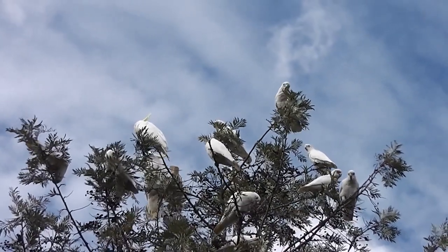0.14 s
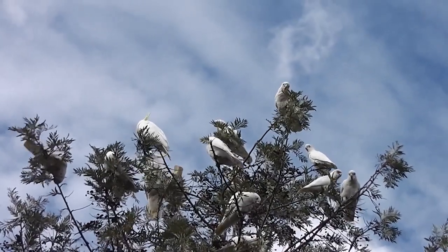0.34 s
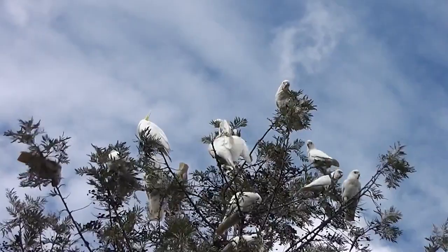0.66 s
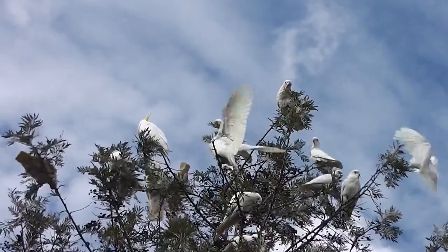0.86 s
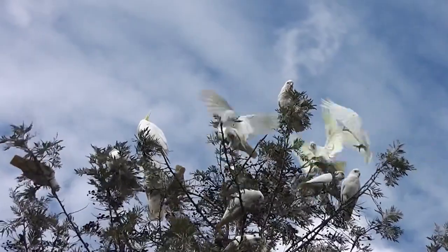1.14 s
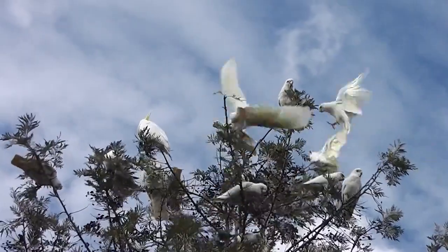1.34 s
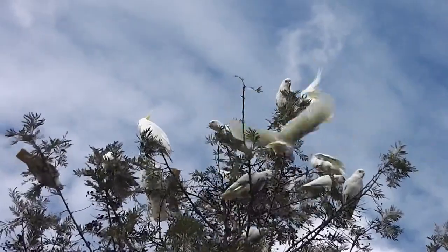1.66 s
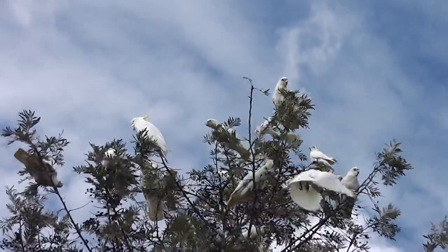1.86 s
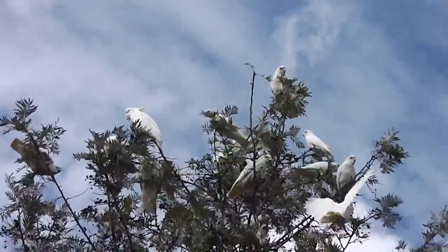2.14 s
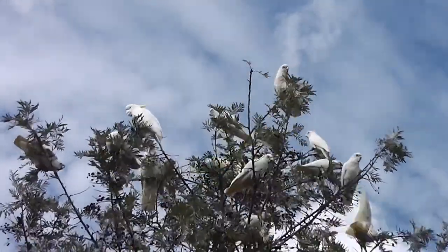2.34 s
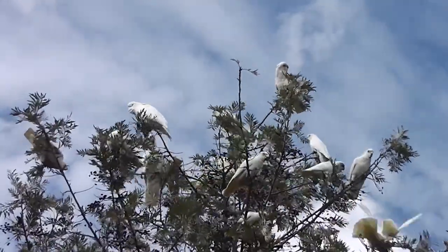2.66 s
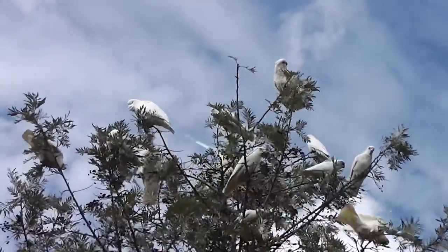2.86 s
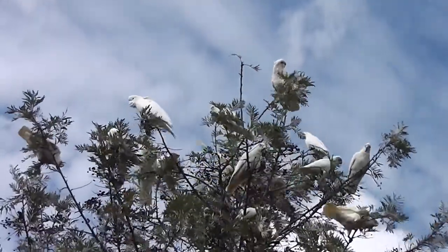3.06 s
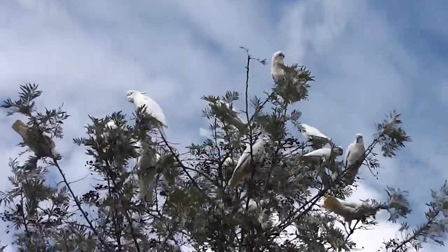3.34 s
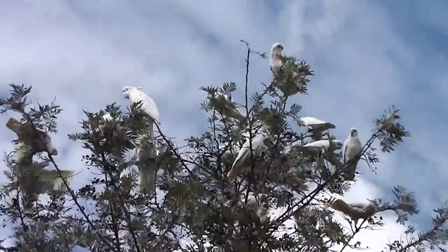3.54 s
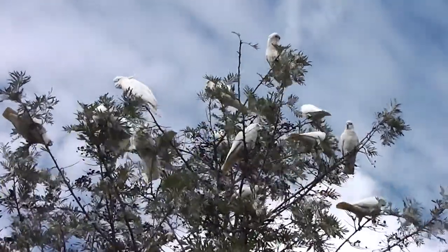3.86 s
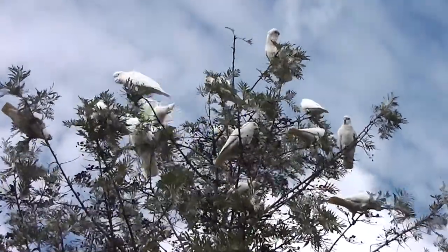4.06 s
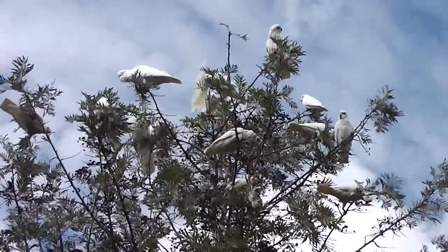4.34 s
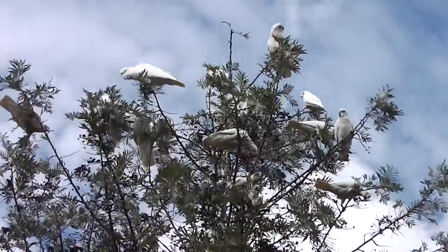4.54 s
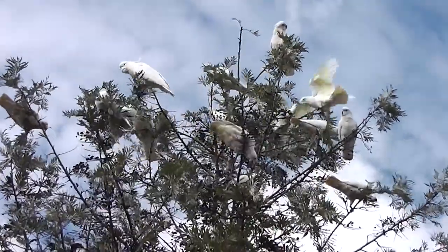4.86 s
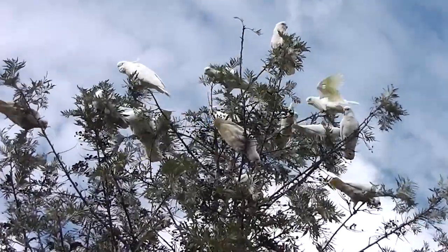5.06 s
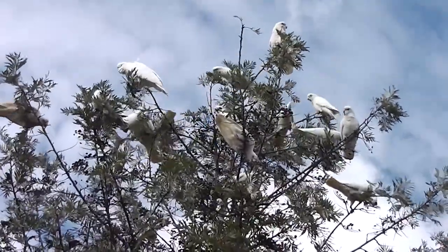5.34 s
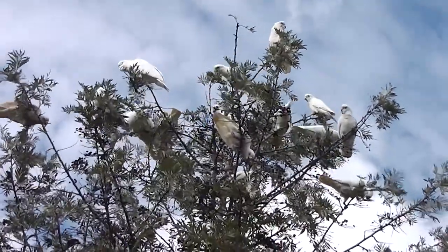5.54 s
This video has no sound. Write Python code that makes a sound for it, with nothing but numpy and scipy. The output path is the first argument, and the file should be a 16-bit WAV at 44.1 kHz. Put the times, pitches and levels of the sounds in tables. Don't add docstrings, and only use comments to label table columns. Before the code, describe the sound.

Large white parrots call from a leafy crown: first one farther harsh screech, then a cluster of close, bright, grating cries. Dry twig cracks, claw ticks and soft wood knocks scatter between them. After a quieter gap, a small two-note whistle and thin chips sound at right, then a short hoarse squawk ends it. Low road rumble and faint hiss lie beneath, in an open-air stereo pickup with short scattered echoes.

```python
import sys
import numpy as np
from scipy import signal
from scipy.fft import rfft, irfft
from scipy.io import wavfile
from scipy.ndimage import uniform_filter1d

SR = 44100
rng = np.random.default_rng(int(sys.argv[2]) if len(sys.argv) > 2 else 0)


def linear_from_db(decibels):
    return 10 ** (np.asarray(decibels, float) / 20)


def dump_mix(stems):
    frames = np.atleast_2d(stems).T
    limited = np.clip(frames, -1, 1)
    pcm = np.round(limited * 32767).astype(np.int16)
    wavfile.write(sys.argv[1], SR, pcm)


N = 251370


def rms_one(x):
    return x / np.sqrt(np.mean(x ** 2) + 1e-20)


def in_time(rows, t):
    s, *columns = np.transpose(rows)
    return [np.interp(t, s, column) for column in columns]


def at_hz(points, hz):
    curve_hz, value = np.transpose(points)
    return np.interp(np.log(hz), np.log(curve_hz), value)


def span(start_s, end_s):
    where = slice(int(start_s * SR), min(int(end_s * SR), N))
    return where, np.arange(where.start, where.stop) / SR


def drift(rate_hz, size):
    r = np.exp(-2 * np.pi * rate_hz / SR)
    warm_up = 9000
    slow = signal.lfilter([1], [1, -2 * r, r * r], rng.standard_normal(size + warm_up))[warm_up:]
    return rms_one(slow - slow.mean())


def coloured(x, spectrum):
    hz = np.maximum(np.fft.rfftfreq(x.shape[-1], 1 / SR), 1)
    return irfft(rfft(x) * linear_from_db(at_hz(spectrum, hz)), x.shape[-1])


def panned(x, pan_db):
    return x * linear_from_db(np.array([[.5], [-.5]]) * pan_db)


def band_pass(x, order, low_hz, high_hz):
    sos = signal.butter(order, [low_hz, high_hz], "band", fs=SR, output="sos")
    return signal.sosfilt(sos, x)


def burst(ring_hz, width_hz, t60_s):
    t = np.arange(2500) / SR
    r = np.exp(-np.pi * width_hz / SR)
    y = rng.standard_normal(len(t)) * linear_from_db(-60 * t / t60_s)
    for _ in range(2):
        y = signal.lfilter([1, 0, -1], [1, -2 * r * np.cos(2 * np.pi * ring_hz / SR), r * r], y)
    return y / np.abs(y).max()


def banded_noise(spectrum, patchy_db, in_step=0.11):
    # pitch_hz, likeness (0-1)
    likeness = [(25, .985), (60, .96), (125, .83), (300, .6), (1000, .55), (3000, .43), (8000, .4),
                (14000, .42)]
    out, together = 0, drift(14, N)
    edges_hz = 20 * 2 ** np.arange(0, 10.5, .5)
    white = rng.standard_normal((2, 2, N))
    for k, (low_hz, high_hz) in enumerate(zip(edges_hz, edges_hz[1:])):
        if high_hz < spectrum[0][0] or low_hz > spectrum[-1][0]:
            continue
        mid, side = band_pass(white[k % 2], 2, low_hz, high_hz)
        alike = np.clip(at_hz(likeness, np.sqrt(low_hz * high_hz)), -1, 1)
        flicker = linear_from_db(patchy_db * (in_step * together + drift(12.4, N)))
        out = out + flicker * (np.sqrt(1 + alike) * mid + np.sqrt(1 - alike) * side * [[1], [-1]])
    return rms_one(coloured(out, spectrum))


def motor_drone(t):
    # pitch_hz, level_db
    hum = [(105, -5), (141, -1.5)]
    # time_s, level_db
    loudness = [(0.0, -57.5), (0.3, -69), (0.45, -61), (1.06, -54), (2.0, -53), (2.3, -52.5), (2.7, -58.5),
                (3.29, -54.5), (3.57, -64), (5.7, -65)]
    motor = 0
    for hz, level_db in hum:
        swell = linear_from_db(level_db + drift(1.6, N))
        phase = 2 * np.pi * np.cumsum(hz * (1 + 0.0081 * drift(1.49, N))) / SR
        motor = motor + swell * np.sin(phase)
    (motor_db,) = in_time(loudness, t)
    return linear_from_db(motor_db) * motor


def background():
    # pitch_hz, level_db
    rumble_colour = [(12, -53), (20, -16), (54, 5.5), (145, -11), (168, -17), (296, -14.5), (400, -5),
                     (520, -12), (880, -120)]
    # pitch_hz, level_db
    traffic_colour = [(200, -3.5), (250, -0.5), (310, -21.5), (450, -2.5), (700, -4), (1200, -5),
                      (1900, -8), (2200, -14), (2700, -26), (4000, -53)]
    # pitch_hz, level_db
    leaf_colour = [(2000, -12), (2800, -7), (4000, -2.5), (6000, -2.5), (9000, -4), (11000, -10),
                   (14000, -24), (16000, -27)]
    # pitch_hz, level_db
    hiss_colour = [(2000, -22), (6000, -28), (15500, -0.5), (17000, -3)]
    # time_s, level_db
    road = [(0.0, -54.5), (0.6, -55.5), (1.1, -53), (2.1, -54), (3.4, -53), (4.7, -54.5), (5.0, -56.5),
            (5.7, -56.5)]
    # time_s, level_db
    leaf_level = [(0.0, -61.5), (0.43, -59), (0.7, -56.5), (0.88, -60), (1.06, -58), (2.06, -58.5), (2.24, -57.5),
                  (2.38, -42), (2.6, -53), (3.29, -51.5), (3.76, -58), (4.05, -59), (4.35, -57), (4.79, -58.5),
                  (4.95, -59.5), (5.21, -62.5), (5.48, -60.5), (5.7, -62)]
    t = np.arange(N) / SR
    (traffic_db,), (leaves_db,) = in_time(road, t), in_time(leaf_level, t)
    rumble_db = -55.5 + 0.38 * (traffic_db - traffic_db.mean()) - 0.48 * t
    rumble = linear_from_db(rumble_db) * banded_noise(rumble_colour, patchy_db=1.0)
    traffic = linear_from_db(traffic_db) * banded_noise(traffic_colour, patchy_db=1.2)
    leaves = linear_from_db(leaves_db) * banded_noise(leaf_colour, patchy_db=1.5, in_step=.8)
    hiss = linear_from_db(-66) * banded_noise(hiss_colour, patchy_db=-0.5)
    return rumble + traffic + leaves + motor_drone(t) + hiss


def echoes(x, crown_db):
    # pitch_hz, level_db
    echo_colour = [(500, -3), (1500, -3), (2400, 5), (6000, 6), (9000, 6), (11000, 5.5)]
    long_t60_s, crown_t60_s, gap_s, echo_db = 0.84, 0.24, 0.0007, -6.5
    t = np.arange(int(.8 * SR)) / SR
    hits = rng.standard_normal((2, len(t))) * (rng.random((2, len(t))) < .05)
    shared = hits + 0.16 * hits[::-1]
    fading = linear_from_db(-60 * t / long_t60_s) + linear_from_db(crown_db - 60 * t / crown_t60_s)
    tail = coloured(shared * fading * np.clip(t / gap_s - 1, 0, 1), echo_colour)
    tail /= np.sqrt(np.sum(tail ** 2) / 2)
    return linear_from_db(echo_db) * signal.fftconvolve(x, tail, axes=1)[:, :N]


def twigs():
    # time_s, peak_db, ring_hz, thud_db, pan_db (left minus
    snaps = [(0.1532, -36.5, 7100, -8, 3), (1.2247, -34, 8100, -7, 2), (1.3962, -38, 8550, -10, 2),
             (2.144, -37, 7600, -18, -5), (2.1694, -30, 8900, -29, 5), (2.1925, -31.5, 8000, -13, -4),
             (2.2104, -35.5, 7800, -21, -4), (2.2556, -20.5, 8600, -18, 0), (2.948, -30, 7300, -20, -2),
             (3.2985, -27, 6660, -27, 1), (3.6001, -35, 5930, -2.5, 0), (4.1548, -45, 6400, 1, -6),
             (4.4463, -29.5, 4960, -7.5, 2), (4.6597, -31, 6960, -9.5, -0.5), (4.886, -34, 7950, -30, 0.0),
             (5.2802, -35, 6340, -34, -1.0)]
    # time_s, peak_db, ring_hz, pan_db
    ticks = [(0.292, -45, 6750, 0.5), (0.386, -46, 8560, 1), (0.398, -46.5, 7400, -10),
             (1.863, -49, 7900, 2), (2.0753, -41, 9200, 3), (2.1053, -41.5, 5150, -1),
             (4.089, -49, 8300, -4.5), (4.285, -45, 6200, 4), (4.4894, -42, 7550, 0),
             (4.606, -50, 5800, -11), (4.765, -53, 7540, -14), (4.809, -40, 9000, 0.0),
             (5.1933, -45, 7790, 0.0), (5.6672, -45, 6580, -4), (5.683, -43, 6200, -1),
             (4.044, -59, 7000, 1), (4.505, -56, 7800, 0.1), (3.196, -32.5, 10300, -2),
             (3.243, -48, 12500, 0.1), (2.908, -48, 10430, 4), (3.0, -45, 12000, 0.1),
             (0.552, -51, 8350, 0.1), (0.602, -41, 10500, 0.1), (1.11, -51, 7500, 3)]
    # time_s, peak_db, ring_hz, pan_db
    brushes = [(1.245, -42.5, 7040, 0.1), (1.385, -45, 8160, 0.1), (1.6457, -43, 8050, 1),
               (1.66, -52, 6200, 0.1), (2.575, -53, 9300, 5), (0.19, -45.5, 7800, 0.1)]
    # time_s, peak_db, ring_hz
    knocks = [(1.235, -44, 625), (1.75, -46, 780), (3.595, -41.5, 635), (3.598, -44, 234),
              (3.809, -42.5, 584), (3.82, -43, 434), (3.95, -48.5, 625), (4.068, -42, 214),
              (4.148, -42.5, 644), (4.443, -34, 1430), (4.445, -42, 596), (4.443, -43, 194),
              (4.707, -42, 557), (4.845, -46, 607), (5.08, -66, 716), (2.3, -43, 240), (2.33, -47, 310),
              (1.3, -48, 330)]
    thud_db = -9
    breaks = [(*row, -11) for row in snaps]
    breaks += [(s, db, hz, thud_db, pan_db, -4.5) for s, db, hz, pan_db in ticks]
    breaks += [(s, db, hz, thud_db, pan_db, 0) for s, db, hz, pan_db in brushes]
    out = np.zeros((2, N + 3000))
    for s, peak_db, ring_hz, thud_db, pan_db, tail_db in breaks:
        tick = burst(ring_hz, 0.5 * ring_hz, 0.0064)
        splinters = linear_from_db(tail_db) * np.array([burst(ring_hz, 5400, 0.11) for ear in "LR"])
        thud = linear_from_db(thud_db) * burst(640, 1300, 0.093)
        at = int(s * SR)
        out[:, at:at + len(thud)] += panned(linear_from_db(peak_db) * (tick + splinters + thud), pan_db)
    for s, peak_db, ring_hz in knocks:
        at, knock = int(s * SR), burst(ring_hz, 190, .032)
        out[:, at:at + len(knock)] += linear_from_db(peak_db) * knock
    return out[:, :N]


def far_call():
    # time_s, pitch_hz, level_db
    call = [
        (0.049, 1770, -69),
        (0.095, 1808, -57.5),
        (0.13, 1697, -49),
        (0.166, 1635, -53),
        (0.19, 1500, -57),
        (0.228, 1530, -76),
    ]
    out = np.zeros(N)
    where, t = span(call[0][0], call[-1][0])
    pitch_hz, level_db = in_time(call, t)
    wobble = 1 + 0.0034 * drift(60, len(t))
    phase = 2 * np.pi * np.cumsum(uniform_filter1d(pitch_hz, size=500) * wobble) / SR
    octave_db = -27 + 0.46 * (level_db.max() - level_db)
    tone = np.sin(phase) + linear_from_db(octave_db) * np.sin(2 * phase)
    loudness = np.sqrt(2) * linear_from_db(level_db + 1.9 * drift(48, len(t)))
    out[where] = loudness * tone * signal.windows.tukey(len(t), .1)
    return panned(out, 8.5)


def small_notes():
    # start_s, end_s, start_hz, end_hz, level_db
    far_notes = [
        (3.755, 3.848, 1500, 1004, -60),
    ]
    # start_s, end_s, start_hz, end_hz, level_db
    gulps = [
        (0.827, 0.86, 631, 530, -38.5),
        (0.844, 0.861, 1610, 1650, -34),
        (0.84, 0.861, 1146, 1090, -33),
        (5.47, 5.52, 677, 665, -41),
        (5.545, 5.6, 900, 883, -53),
        (5.55, 5.585, 1220, 1210, -53),
    ]
    # start_s, end_s, start_hz, end_hz, level_db
    chips = [
        (4.108, 4.125, 3000, 3220, -44.5),
        (4.205, 4.256, 895, 860, -38),
        (4.215, 4.249, 2870, 3080, -42.5),
        (4.21, 4.25, 3700, 3400, -53),
        (4.215, 4.25, 4820, 4850, -63),
        (4.21, 4.245, 5600, 5600, -53),
        (4.21, 4.245, 7000, 7600, -57),
    ]
    out = np.zeros((2, N))
    for rows, pan_db in [(far_notes, 8.5), (gulps, 0), (chips, -8)]:
        for start_s, end_s, start_hz, end_hz, level_db in rows:
            where, t = span(start_s, end_s)
            tone = np.sin(2 * np.pi * np.cumsum(np.linspace(start_hz, end_hz, len(t))) / SR)
            loudness = linear_from_db(level_db + 1.0 + 2 * drift(44, len(t)))
            out[:, where] += panned(tone * signal.windows.tukey(len(t), .6) * loudness, pan_db)
    return out


def hoarse_notes():
    # start_s, end_s, pitch_hz, width_hz, level_db
    breaths = [(5.5, 5.635, 3800, 530, -60.5), (5.52, 5.585, 2670, 670, -51),
               (5.425, 5.45, 3500, 310, -45.5), (4.335, 4.43, 3520, 180, -59),
               (4.33, 4.47, 4350, 1300, -59), (0.76, 0.83, 3150, 510, -42), (2.67, 2.73, 14000, 1400, -60),
               (0.78, 0.86, 660, 120, -55), (3.39, 3.46, 1433, 270, -32), (3.385, 3.46, 2180, 400, -35.5),
               (1.22, 1.33, 2500, 1500, -62.5), (5.44, 5.51, 1850, 1200, -48), (3.17, 3.3, 820, 430, -51),
               (2.3, 2.4, 4030, 780, -32), (2.68, 2.78, 3900, 540, -33), (0.52, 0.71, 1230, 820, -43),
               (0.73, 0.84, 4900, 1300, -48)]
    out = np.zeros(N)
    for start_s, end_s, hz, width_hz, level_db in breaths:
        where, t = span(start_s, end_s)
        air = rng.standard_normal(len(t)) * linear_from_db(4 * drift(200, len(t)))
        rung = rms_one(band_pass(air, 2, hz - width_hz / 2, hz + width_hz / 2))
        out[where] += rung * signal.windows.tukey(len(t), .6) * linear_from_db(level_db)
    return out


def whistle():
    # time_s, pitch_hz, level_db
    whistled = [
        [(4.035, 2090, -65), (4.043, 2100, -44), (4.078, 2097, -38), (4.1, 2090, -38), (4.109, 2130, -68)],
        [(4.122, 2057, -49), (4.13, 2110, -41), (4.156, 2190, -37), (4.185, 2080, -37.5), (4.212, 2006, -35),
         (4.234, 2140, -43), (4.255, 2220, -52)],
    ]
    # second_db, third_db, fourth_db (beside the first)
    overtones = [
        (-9, -20, -31),
        (-7.5, -14.5, -33),
    ]
    # second, third, fourth (dB per s)
    overtone_fade = [
        (-30, -30, 30),
        (-56, -85, -100),
    ]
    out = np.zeros(N)
    for rows, overtones_db, fades in zip(whistled, overtones, overtone_fade):
        where, t = span(rows[0][0], rows[-1][0])
        pitch_hz, level_db = in_time(rows, t)
        partials_db = [level_db]
        for db, fade in zip(overtones_db, fades):
            partials_db.append(level_db + db + fade * (t - t.mean()))
        wobble = 1 + 0.0011 * drift(80, len(t))
        phase = 2 * np.pi * np.cumsum(uniform_filter1d(pitch_hz, size=700) * wobble) / SR
        for k, db in enumerate(partials_db, start=1):
            out[where] += np.sqrt(2) * linear_from_db(db) * np.sin(k * phase)
        out[where] *= signal.windows.tukey(len(t), .08) * linear_from_db(drift(74, len(t)))
    return panned(out, -10)


def screech(rows, voice, throat, beak, closing, ring):
    # pitch_hz, width_hz
    hollows = [
        (4500, 310),
        (8400, 740),
    ]
    flutter_hz, swell, pull, jitter, breath = voice
    where, t = span(rows[0][0], rows[-1][0])
    size = len(t)
    cycle_hz, level_db, gape_db, chest_db = in_time(rows, t)

    rasp = np.clip(1 - .08 * chest_db, .3, 1.4)
    rasp = rasp * np.interp(t - t[0], [0, 0.031], [0.34, 1])

    along = np.linspace(-.5, .5, size)
    weak_db = level_db.max() - level_db
    first_db = beak[0] + closing[0] * along + 0.16 * weak_db - 0.87 * gape_db + chest_db
    middle_db = beak[1] + closing[1] * along + gape_db
    bright_db = beak[2] + closing[2] * along + gape_db

    flutter = 2 * np.pi * np.cumsum(flutter_hz * (1 + .1 * drift(30, size))) / SR
    phase = 2 * np.pi * np.cumsum(cycle_hz * (1 + rasp * jitter * drift(150, size))) / SR
    phase = phase + rasp * pull * np.sin(flutter)
    pulses = 0
    for k, db in enumerate([first_db, 0, middle_db, middle_db] + [bright_db] * 8, start=1):
        lean = rng.uniform(0, 2 * np.pi) + (1.15 if k == 1 else 1.44) * drift(35.0, size)
        swelling = 1 + swell * np.cos(flutter + lean) + 0.19 * drift(100, size)
        extra_rasp = .4 * rasp / k ** 2 * np.sin(flutter)
        partial = np.cos(k * phase + lean + extra_rasp)
        pulses = pulses + linear_from_db(db + 1.5 * drift(45, size)) * swelling * partial
    pulses = rms_one(pulses)

    half = np.clip(beak[3] * (1 + 0.51 * along), 0, 1)
    strong_weak = 1 + half * 2 * rasp * np.cos(phase / 2 + 0.88 * drift(104, size))
    gusts = (1 + np.cos(phase)) * (1 + swell * np.cos(flutter)) * rng.standard_normal(size)
    voiced = coloured(pulses * strong_weak + breath * gusts, throat)
    voiced = band_pass(voiced, 5, 600, 11000)
    voiced = voiced / np.sqrt(uniform_filter1d(voiced ** 2, size=900) + 1e-12)
    for (hz, width_hz), ring_db in zip(hollows, in_time(ring, t) if ring else []):
        hollow = band_pass(pulses + gusts, 2, hz - width_hz / 2, hz + width_hz / 2)
        voiced = voiced + linear_from_db(ring_db) * rms_one(hollow)
    out = np.zeros(N)
    out[where] = voiced * linear_from_db(level_db) * signal.windows.tukey(size, .012 * SR / size)
    return out


def parrots():
    # time_s, cycle_hz, level_db, gape_db (beak opening), chest_db (chest tone)
    far_screech = [(0.489, 1049, -48, 3, 2), (0.496, 1040, -44, -2, -5), (0.56, 1015, -38, 3, -3),
                   (0.619, 1004, -36, 5, 3.5), (0.691, 1067, -37.5, -2, -2.5), (0.75, 1081, -33, 1, -1.5),
                   (0.809, 1050, -35.5, -4.5, -3.5), (0.838, 1028, -32.5, 2.5, -8),
                   (0.85, 1065, -36.5, 6, 2)]
    # time_s, cycle_hz, level_db, gape_db, chest_db
    near_screeches = [
        [(2.262, 1032, -42, -15, -2), (2.284, 1091, -34.5, -3.5, -11), (2.298, 1307, -27, 3, 1.5),
         (2.315, 1270, -25, 1.5, 4.5), (2.335, 1352, -23, 3, -3), (2.37, 1358, -27, 1, -3),
         (2.41, 1296, -28, 0.5, -4.5), (2.455, 1233, -23, 1.5, 0.5), (2.518, 1134, -31.5, 3.5, 2.5)],
        [(2.626, 1226, -38, -12, 2), (2.655, 1241, -25, -5, 2), (2.696, 1197, -20, -1.5, -5),
         (2.72, 1144, -20, -3.5, -5), (2.742, 1183, -22.5, 3.5, 3), (2.775, 1237, -21.5, -6, -5),
         (2.805, 1230, -35.5, -30, 1)],
        [(2.97, 1165, -50, -10, 2), (2.986, 1211, -29.5, -6, -11), (3.03, 1249, -21.5, 2, 0.5),
         (3.08, 1242, -23.5, 2, -4), (3.106, 1249, -21.5, 0.5, 4), (3.145, 1278, -22.5, -0.5, -3),
         (3.2, 1184, -24, -1, -1.5), (3.226, 1159, -34.5, -14, 6)],
        [(3.382, 1157, -47, -1, -6), (3.4, 1190, -27, 1.5, 1.5), (3.424, 1191, -23, 6, 2.5),
         (3.45, 1206, -25, 0.5, -4), (3.47, 1210, -38, 3, 0.1)],
        [(5.42, 1127, -68, 7, 6), (5.43, 1120, -42, -8, -17), (5.46, 1210, -27.5, 0.5, -1.5),
         (5.484, 1216, -25.5, -1.4, -3.5), (5.525, 1173, -41, -10, -17)],
    ]
    # flutter_hz, flutter_swell (0-1), flutter_pull (rad), jitter (0-1), breath (share)
    voices = [
        (230, .62, .24, .013, .1),
        (200, .55, .23, .016, .13),
        (215, .6, .32, .017, .13),
        (215, .65, .27, .013, .13),
        (205, .6, .42, .023, .18),
        (230, .55, .24, .016, .1),
    ]
    # pitch_hz, level_db
    throats = [
        [(400, 16.5), (1900, 7.5), (2580, -5.5), (3200, -11), (3800, -12), (6000, -18), (9860, -35),
         (13000, -48)],
        [(400, -41), (628, -2), (900, 3.5), (2500, 1.5), (3210, 2.5), (4500, -2), (7810, -15.5), (13000, -49)],
        [(400, -21.5), (918, 1), (1800, -12), (2300, -1), (3560, -3), (4760, -8), (6800, -8), (13000, -38.5)],
        [(400, -15), (1230, 1.5), (1960, 1.5), (2700, -7), (3710, -15.5), (4360, -19), (6750, -17),
         (13000, -48)],
        [(400, -48), (666, -6.5), (1260, -3), (2900, -13.5), (3610, -9.5), (4110, -16), (5200, -12),
         (13000, -43.5)],
        [(400, -43), (700, -1), (1160, 3), (1900, -7), (3000, -11.5), (3660, -8), (6500, -9.5), (13000, -38.5)],
    ]
    # first_partial_db, middle_partials_db, brightness_db, half_rate (share)
    beaks = [
        (-7.5, 5, 5, 0.22),
        (3.5, -2.5, 0, 0.28),
        (-5.5, 2.5, 2, 0.36),
        (-3, 10, 3.5, 0.19),
        (-3.5, -3.5, -4, 0.43),
        (1.5, 5.5, 6.5, 0.35),
    ]
    # first_partial_db, middle_partials_db, brightness_db
    closings = [
        (-3.5, 11, 4),
        (9, -0.5, 2.5),
        (31, 11.5, 3),
        (-7, -3, -4),
        (26, 4, 15),
        (3, 9, 10),
    ]
    # time_s, throat_hollow_db, beak_hollow_db (beside the voice)
    beak_ring = [(0.484, -30, -50), (0.54, -8.5, -44), (0.59, -8.5, -43), (0.615, -14, -24),
                 (0.66, -23, -12), (0.69, -24, -38), (0.72, -30, -23), (0.825, -16, -6), (0.85, -26, -30)]
    calls = [far_screech] + near_screeches
    rings = [beak_ring] + [None] * len(near_screeches)
    flock = hoarse_notes()
    for call in zip(calls, voices, throats, beaks, closings, rings):
        flock = flock + screech(*call)
    return panned(flock, -0.074)


def scene():
    flock, clear = parrots(), whistle()
    small = small_notes() + far_call()
    crown_echo = echoes(flock + linear_from_db(3.0) * small, crown_db=23)
    whistle_echo = echoes(linear_from_db(2.5) * clear, crown_db=7.5)
    return flock + clear + small + crown_echo + whistle_echo + twigs() + background()


def low_pass(x):
    return signal.sosfilt(signal.butter(12, 15750, fs=SR, output="sos"), x)


def record(dry):
    cut = signal.sosfilt(signal.cheby2(12, 60, 16500, fs=SR, output="sos"), dry)
    top = irfft(rfft(cut) * (np.fft.rfftfreq(N, 1 / SR) > 15100), N)
    loud = uniform_filter1d(np.mean(cut ** 2, axis=0), size=1500) > linear_from_db(2 * -38)
    mix = cut - top * uniform_filter1d(loud * 1.0, size=600)
    return low_pass(mix)


dry = scene()
out = record(dry)
dump_mix(out)
```